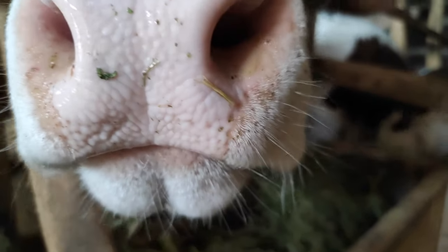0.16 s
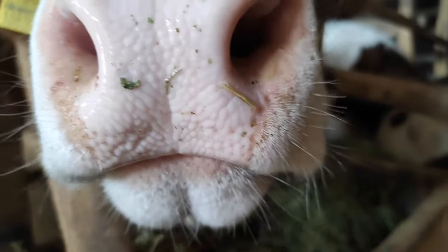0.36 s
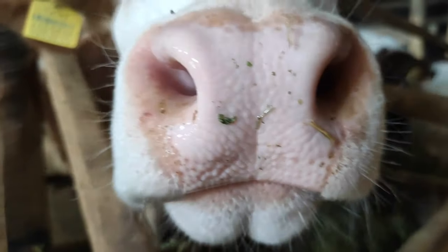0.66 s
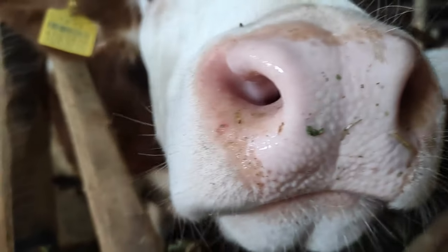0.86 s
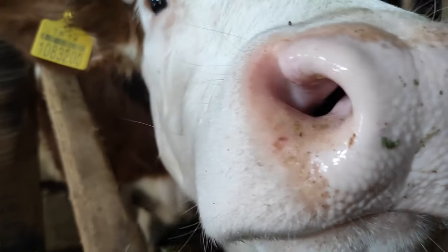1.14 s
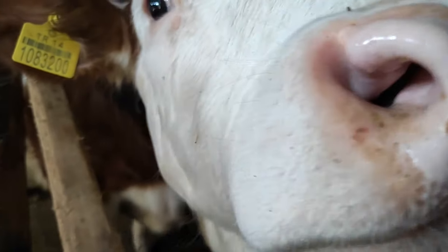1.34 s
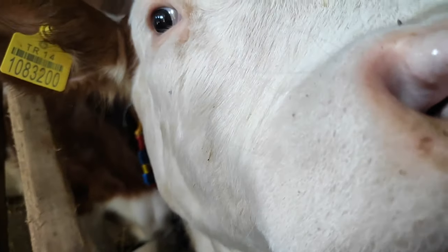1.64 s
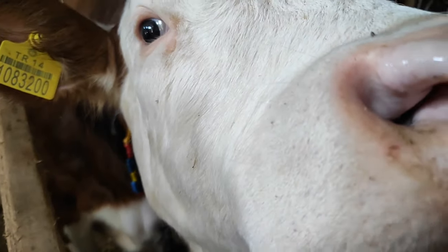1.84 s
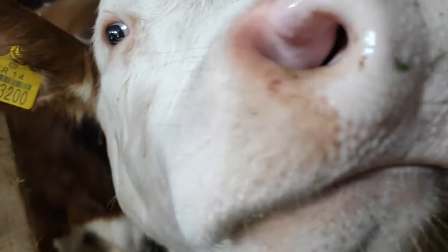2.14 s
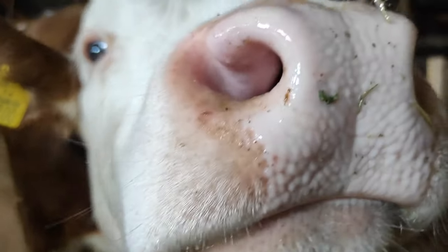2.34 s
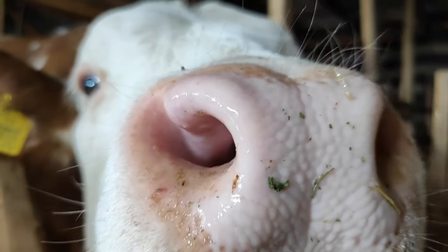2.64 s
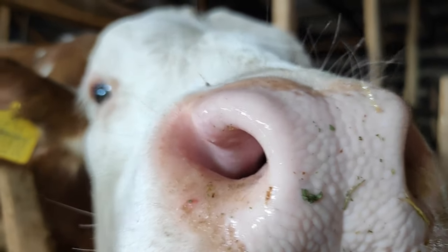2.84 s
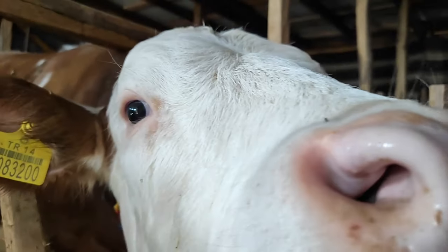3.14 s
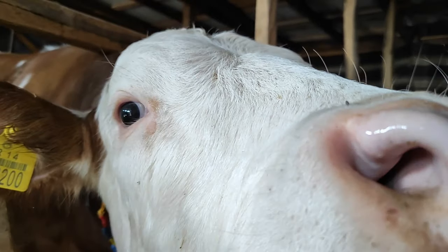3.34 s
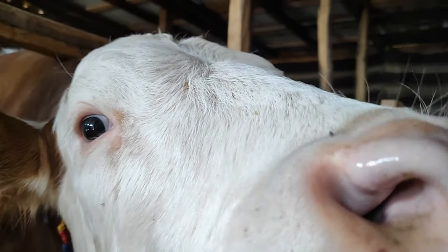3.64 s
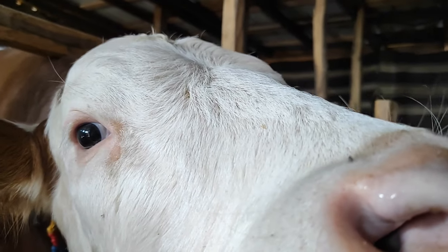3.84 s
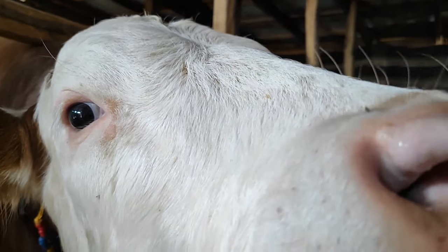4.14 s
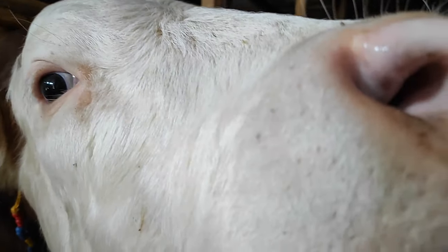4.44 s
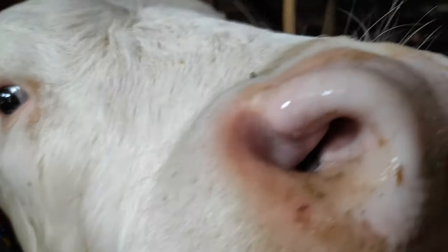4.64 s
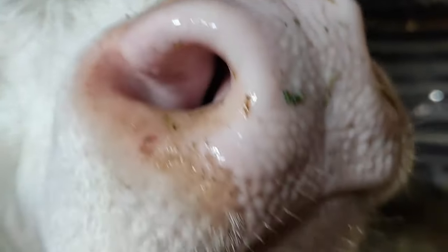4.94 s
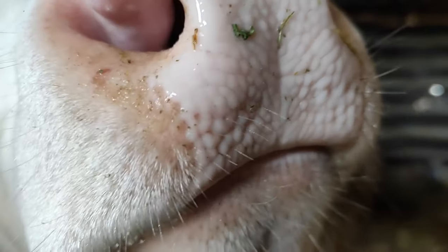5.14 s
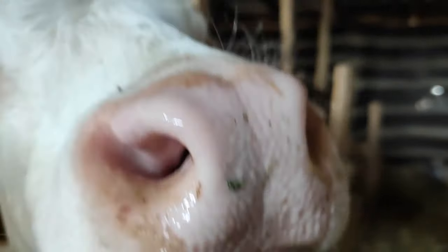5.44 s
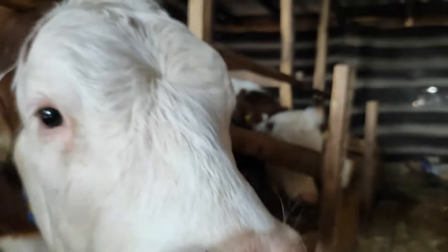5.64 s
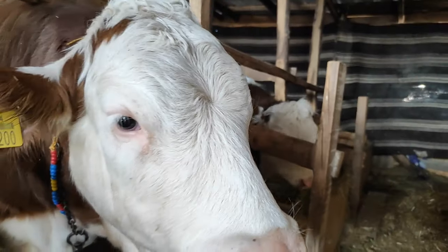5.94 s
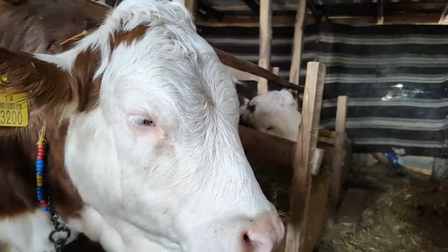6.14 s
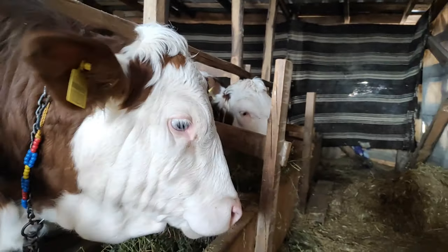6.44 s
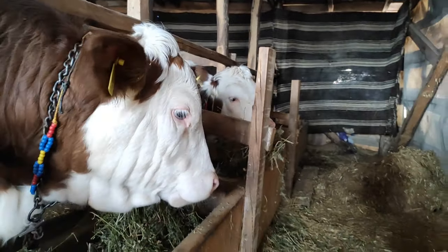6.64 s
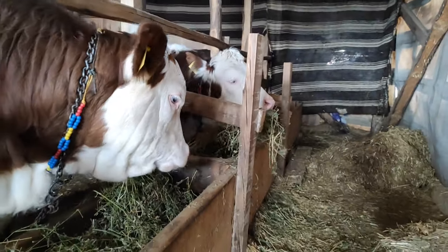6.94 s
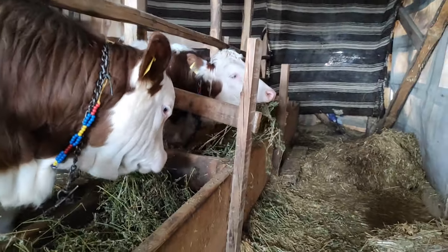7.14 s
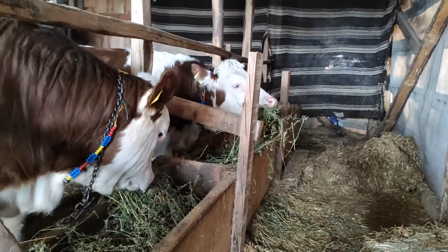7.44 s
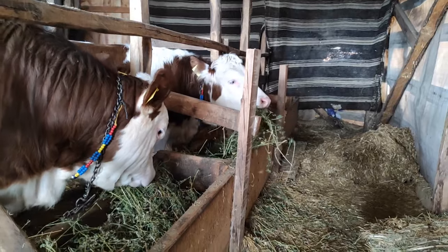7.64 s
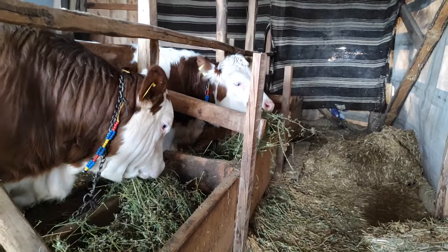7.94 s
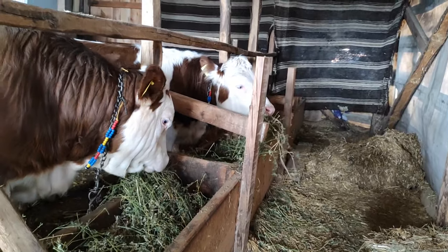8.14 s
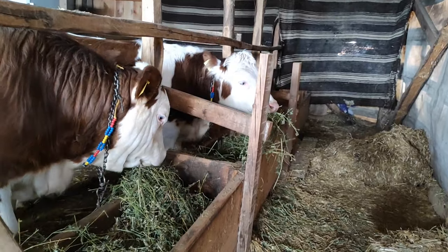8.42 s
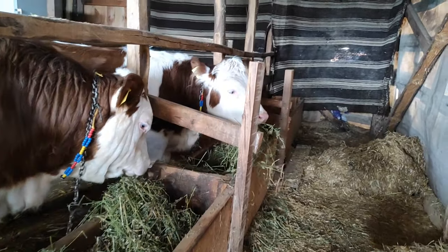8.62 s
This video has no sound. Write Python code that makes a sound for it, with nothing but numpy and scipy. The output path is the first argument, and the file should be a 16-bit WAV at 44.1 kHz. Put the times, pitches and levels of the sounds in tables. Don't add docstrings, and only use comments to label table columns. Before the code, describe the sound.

Close wet nostril blows, hollow plank bumps, fizzing hay and jingling chains as cows feed in a barn, tether jolting near the end.

```python
import sys
import numpy as np
from scipy import signal
from scipy.fft import rfft, irfft
from scipy.io import wavfile
from scipy.ndimage import uniform_filter1d

SR = 44100
rng = np.random.default_rng(int(sys.argv[2]) if len(sys.argv) > 2 else 0)


def wav_out(sig):
    wavfile.write(sys.argv[1], SR, np.round(np.clip(np.atleast_2d(sig).T, -1, 1) * 32767).astype(np.int16))


def amplitude_ratio(level_db):
    exponent = np.asarray(level_db, float) / 20
    return 10 ** exponent


N = 387198


def evened(x):
    return x / np.sqrt(np.mean(x ** 2) + 1e-20)


def read(points, hz):
    f, value = np.transpose(points)
    return np.interp(np.log(hz + 1), np.log(f + 1), value)


def add(mix, s, sound):
    part = mix[round(s * SR):][:len(sound)]
    part += sound[:len(part)]


def coloured(x, points):
    gain_db = np.maximum(read(points, abs(np.fft.fftfreq(4096, 1 / SR))), -90)
    log_gain = np.log(amplitude_ratio(gain_db))
    taps = np.fft.ifft(np.exp(signal.hilbert(log_gain).conj())).real[:2048]
    return signal.oaconvolve(x, taps[None], axes=1)[:, :N]


def level(moves, rest_db, companion=False):
    t = np.arange(0, N + 256, 256) / SR
    peak, rise, fall, db, over_db = np.transpose(moves)[:, :, None]
    away = np.maximum((peak - t) / abs(rise), (t - peak) / abs(fall))
    swell_db = db + companion * over_db - 10 * away
    power = amplitude_ratio(2 * swell_db).sum(0) + amplitude_ratio(2 * rest_db)
    return np.interp(np.arange(N) / SR, t, np.sqrt(power))


# frequency in Hz, left-right likeness from 0 to 1.
PORT_LIKENESS = [(40, 0.36), (150, 0.97), (350, 0.99), (700, 0.18), (2000, 0.18), (8000, 0.11),
                 (14000, 0.41)]


def paired(left, other, hz):
    same = np.clip(read(PORT_LIKENESS, hz), 0, 1)[:, None]
    return np.array([left, same * left + np.sqrt(1 - same ** 2) * other])


def hiss(points, patchy_db, flicker_db, size):
    frames, hz = 4 * N // size + 5, np.fft.rfftfreq(size, 1 / SR)
    a, b, c, d, patches = rng.standard_normal((frames, len(hz), 5)).T
    patches = uniform_filter1d(patches, size=4, axis=0)
    patches = evened(uniform_filter1d(patches, size=12, axis=1))
    flicker = evened(uniform_filter1d(rng.standard_normal(frames), size=6))
    z = paired(a + 1j * b, c + 1j * d, hz)
    z *= amplitude_ratio(read(points, hz)[:, None] + patchy_db * patches + flicker_db * flicker)
    return evened(signal.istft(z, nperseg=size, noverlap=3 * size // 4)[1][:, :N])


def crackle(points, per_s, spread_db):
    size_db = spread_db * np.minimum(rng.exponential(1, (3, N)), 4)
    size = amplitude_ratio(size_db) * rng.choice([-1, 1], (3, N))
    clicks = size * (rng.random((3, N)) < per_s / SR)
    return evened(coloured(clicks[:2] + 0.62 * clicks[2], points))


# frequency in Hz, density in dB per Hz.
HUM_COLOUR = [(12, -54), (20, -9.5), (81, -21.5), (150, -1), (200, -0.5), (260, -31), (440, -120)]


def still_air():
    return amplitude_ratio(-54.5 + 3.5) * hiss(HUM_COLOUR, patchy_db=3.0, flicker_db=3.0, size=2048)


# peak in seconds,
# rise in seconds per 10 dB, fall in seconds per 10 dB, air in dB, plank rumble over air in dB.
SNORTS = [(0.0, .3, 0.1, -48, 6), (.37, 1.5, -2, -57.5, 8), (.8, 0.4, 0.4, -47, 4.5),
          (1.0, 0.07, 0.36, -44.5, 1.5), (1.17, -0.07, 0.3, -41, 6), (1.31, -0.15, 0.1057, -37.5, 9),
          (1.4, -0.3, 0.0799, -42, 9.5), (1.52, -0.05, 0.18, -45.5, 7), (1.88, 0.16, -0.02, -40, 6.5),
          (2.27, 0.15, 0.1955, -45, -4), (2.45, 0.1172, 0.4, -53.5, 9.5), (2.7, 0.2169, 0.0378, -47.5, 9.5),
          (3.2, 0.3, 0.1461, -48.5, 1), (3.83, 0.04, 0.11, -37.5, -1.5), (3.89, 0.0862, 0.0206, -49.5, 9),
          (4.67, 0.6, 1.84, -51.5, 8.5), (5.04, 0.0304, 0.3, -36.5, -6), (5.41, 0.0831, 0.22, -26.5, -11.5),
          (5.68, 0.22, 0.07, -33.5, -5.5), (5.78, 0.24, 0.01, -39.5, -2.5), (6.19, 0.4, -0.3, -46, -7),
          (6.42, 0, 1.4, -56.5, 8.5), (6.82, 0.08, 0.2, -31, -11), (7.0, 0.03, 0.07, -31, -9),
          (7.6, 0.1, 0.8686, -48, -5), (7.87, 0.08, 0.22, -34.5, -16), (8.33, 0.65, 0.0646, -52, 9)]
# frequency in Hz, density in dB per Hz.
RUMBLE_COLOUR = [(53, -50), (90, -13.5), (147, -10.5), (227, 3.5), (314, -11.5), (360, -9.5), (400, 0),
                 (520, -42.5), (880, -120)]


def rumble():
    noise = hiss(RUMBLE_COLOUR, patchy_db=3.0, flicker_db=0.5, size=1024)
    return amplitude_ratio(1.0) * level(SNORTS, rest_db=-62, companion=True) * noise


# frequency in Hz, density in dB per Hz.
BREATH_COLOUR = [(180, -37), (300, -11), (449, -1), (522, -6.5), (589, -0.5), (790, -7), (997, -7),
                 (1100, -10.5), (1430, -41.5), (2420, -120)]


def blowing():
    air = hiss(BREATH_COLOUR, patchy_db=3.0, flicker_db=1.0, size=512)
    bumps = crackle(BREATH_COLOUR, per_s=130, spread_db=1.5)
    return amplitude_ratio(4.5) * level(SNORTS, rest_db=-61) * evened(air + .6 * bumps)


# peak in seconds, rise in seconds per 10 dB,
# fall in seconds per 10 dB, scraping in dB, stalks over scraping in dB.
PULLS = [(0.0, .3, 0.5, -52, 3.5), (.37, 0.23, 0.22, -59.5, 16), (.8, 0, -1.5, -53.5, 3.5),
         (1.155, 0.012, 0.4, -40, -1.5), (1.235, 0.025, 0.1, -39, -3), (1.35, 0.08, 0.15, -40.5, -5),
         (1.6, 0.6, -0.5, -57, 5), (1.88, 0.6, 0.13, -48, 4), (2.25, 0.14, 0.25, -48, 8),
         (2.66, 0.36, 0.2, -46.5, 1.5), (3.67, 0.3, 0.5, -50.5, 5), (3.89, 0.08, 0.05, -39.5, -5),
         (4.3, 0.5449, 1.4, -55, 5.5), (5.04, 0.23, 0.104, -45, 3.5), (5.16, 0.06, 0.2, -35.5, -4),
         (5.3, 0.1959, 0.2344, -30.5, -1), (5.44, 0.0887, .15, -32, -2), (5.56, 0.09, 0.1841, -30.5, -4),
         (5.63, .04, 0.09, -33.5, -3.5), (5.74, 0.12, 0.029, -35, -3.5), (6.15, 0.33, 0.18, -43, 1),
         (6.52, 0, 0.17, -42.5, 0.5), (6.36, 0.4, 0.34, -52.5, 7), (6.8, 0.1151, 0.08, -30, -7),
         (6.66, -0.02, 0.3, -39, -3.5), (6.9, -0.02, 0.13, -29.5, -3.5), (6.98, 0.1021, 0.07, -25.5, -3),
         (7.6, 0.1, 0.8, -45.5, -6.5), (7.75, -0.1, -0.11, -30.5, -7.5), (7.89, 0.11, 0.16, -34.5, -2.5),
         (8.26, 0.3976, 0.12, -36.5, -2), (8.68, 0.4, 2, -59, 14)]
# frequency in Hz, density in dB per Hz.
SCRAPE_COLOUR = [(650, -34), (1100, -1), (1300, -3.5), (1410, -2.5), (1630, -3.5), (2180, -4.5),
                 (2960, -2.5), (3350, -4.5), (5000, -15.5), (6500, -42.5), (11000, -120)]


def scraping():
    drag = hiss(SCRAPE_COLOUR, patchy_db=2.5, flicker_db=2.0, size=512)
    slips = crackle(SCRAPE_COLOUR, per_s=250, spread_db=3.0)
    return amplitude_ratio(3.5) * level(PULLS, rest_db=-63) * evened(drag + 0.37 * slips)


# frequency in Hz, density in dB per Hz.
HAY_COLOUR = [(2820, -43), (4800, -10), (6080, -6), (6460, -6), (7820, 3.5), (8650, -7), (9910, -18),
              (13300, -20.5), (15000, -27), (15700, -32.5), (16000, -20.5)]


def hay():
    rustle = hiss(HAY_COLOUR, patchy_db=2.5, flicker_db=1.5, size=256)
    snaps = crackle(HAY_COLOUR, per_s=250, spread_db=0.5)
    return amplitude_ratio(3.5) * level(PULLS, rest_db=-52.5, companion=True) * evened(rustle + 0.51 * snaps)


def place(room, k, s, sound, dry_db, wet_db):
    near, spots = room
    add(near, s, amplitude_ratio(dry_db) * sound)
    add(spots[k % 3], s, amplitude_ratio(wet_db) * sound)


def shaken(hz, t, loose):
    wander = uniform_filter1d(rng.standard_normal((2, len(t))), size=300)
    a, b = (evened(v) for v in uniform_filter1d(wander, size=300))
    tone = (1 + loose * (a + 1j * b)) * np.exp(2j * np.pi * hz * t)
    return tone.imag / np.sqrt(1 + 2 * loose ** 2)


def rings(hz, partials, t60, t):
    return sum(amplitude_ratio(db - 60 * t * ratio / t60) * shaken(hz * ratio, t, loose=.9) for ratio, db in partials)


# ratio to the ring, level in dB.
BOARD_PARTIALS = [(1.0, 6), (1.45, 3), (1.7, 2), (2.1, -3.5), (3.1, -9), (.71, -0.5), (0.52, -6)]


def knock(hz, bright_db):
    t, t60 = np.arange(SR // 5) / SR, .105
    crack = signal.lfilter([.3, -.3], np.poly([.75, .96]), rng.standard_normal(len(t)))
    rattle = crack * amplitude_ratio(bright_db - 60 * t / t60)
    return (amplitude_ratio(-5.5) * rings(hz, BOARD_PARTIALS, .4 * t60, t) + rattle) * np.minimum(t / .003, 1)


# start in seconds, blow in dB, ring in Hz, brightness in dB.
KNOCKS = [(0.19, -37, 216, -23.5), (0.249, -33.5, 677, -5.5), (0.372, -28.5, 203, -1.5),
          (0.614, -32, 191, -14), (0.689, -42.5, 219.5, -4), (1.18, -18, 214, -10),
          (1.453, -19.5, 211.5, -11.5), (1.536, -23, 207, -21.5), (2.212, -29, 236.1, -6.5),
          (3.117, -33, 600, 0), (3.783, -17, 395, 2.5), (3.838, -23, 659, -1), (4.252, -34.5, 207, -13.5),
          (4.542, -37.5, 160.4, -12.5), (4.617, -34, 176, -15), (5.242, -22, 575.8, -5),
          (6.025, -21, 804, 3.5), (6.356, -36, 186, -3), (6.505, -29, 406, 2.5), (6.647, -18, 427, 2),
          (7.405, -29, 302, -2), (7.524, -32.5, 456, 0), (7.685, -23.5, 700, -0.5),
          (8.651, -43, 336.1, -16), (8.736, -34.5, 199, -15)]


def plank_knocks(room):
    for k, (s, db, hz, bright_db) in enumerate(KNOCKS):
        place(room, k, s, amplitude_ratio(db) * knock(hz, bright_db), dry_db=3.5, wet_db=6.5)


# start in seconds, level in dB.
TICKS = [(0.2432, -14), (1.148, -21), (2.4886, -22), (2.594, -16.5), (3.305, -23.5), (3.4316, -22),
         (3.455, -29), (3.475, -27), (3.494, -17), (3.6455, -12.5), (3.7593, -14), (3.7856, -14),
         (4.244, -22), (4.8893, -20), (5.409, -3), (5.9304, -14), (6.02, -8), (6.5, -13.5), (6.6458, -12),
         (7.333, -24), (7.519, -25), (7.5871, -17.5)]


def ticks(room):
    t = np.arange(800) / SR
    for s, db in TICKS:
        add(room[0], s, amplitude_ratio(db - 1.0 - 60 * t / 0.01) * np.diff(rng.standard_normal(801)))


# ratio to the ring, level in dB.
LINK_PARTIALS = [(0.998, 5), (1.119, -1.5)]
# frequency in Hz, level in dB.
CHAIN_MODES = [(1690, -4), (2450, 1), (2950, -3.5), (3900, -1), (6600, 0.5), (8380, -1.5)]


def clink(hz, ring_db):
    t = np.arange(SR // 5) / SR
    crack = rng.standard_normal(len(t)) * (amplitude_ratio(-60 * t / 0.0084) + amplitude_ratio(-3.0 - 60 * t / .06))
    chain = np.zeros(len(t))
    for f, db in CHAIN_MODES:
        mode = np.sin(2 * np.pi * f * rng.uniform(0.97, 1.02) * t)
        chain += amplitude_ratio(db + 2.6 * rng.standard_normal()) * mode
    ring = amplitude_ratio(ring_db) * rings(hz, LINK_PARTIALS, 0.11, t) + amplitude_ratio(-15.5 - 60 * t / .06) * chain
    return (amplitude_ratio(2.5) * crack + ring) * np.minimum(t / .0008, 1)


# start in seconds, crack in dB, ring of the clearer link in Hz,
# ring over crack in dB.
CLINKS = [(0.2436, -24.5, 4201, -14), (0.8345, -35.5, 2250, -19), (0.9497, -30, 8360, -3),
          (1.2208, -22.5, 2478, -20.5), (1.3902, -31, 8270, -0.5), (1.7498, -29, 3970, -12),
          (2.418, -39.5, 4040, -7.5), (2.4877, -34, 2330, -12), (2.593, -28, 2950, -15),
          (2.6713, -33.5, 3921, -7), (2.748, -37, 4012, -5.5), (3.1164, -31, 2435, -11),
          (3.2027, -28, 7600, -17), (3.3045, -33.5, 1680, -29), (3.495, -41, 8837, -5),
          (3.6448, -20.5, 7696, -29.5), (3.7589, -22.5, 1475, -7), (3.7843, -13.5, 6700, -18),
          (3.803, -17, 8150, -17), (4.2423, -24.5, 8470, -10), (4.3629, -31.5, 3720, -8.5),
          (4.6054, -33.5, 3720, -9.5), (4.8883, -28.5, 3690, -6.5), (4.9202, -29.5, 6630, -20.5),
          (5.4087, -15.5, 1497, -17), (5.9294, -34, 3703, -2.5), (6.0216, -14, 7350, -18.5),
          (6.37, -31.5, 3716, -6), (6.5003, -21.5, 6814, -18.5), (6.6436, -32, 7410, -16),
          (7.3335, -28, 6620, -17), (7.521, -29.5, 1682, -10.5), (7.5871, -28.5, 6600, -10)]


def chain_clinks(room):
    for k, (s, db, hz, ring_db) in enumerate(CLINKS):
        place(room, k, s, amplitude_ratio(db) * clink(hz, ring_db), dry_db=2.0, wet_db=1.5)


TWIN_OFFSETS = (-97, -41, 29, 73)


def ping(hz, t60, t):
    t60 = np.clip(t60, .02, 2)
    share = min(.09 / t60, .8)
    twins = sum(np.sin(2 * np.pi * (hz + off) * t + off) for off in TWIN_OFFSETS)
    ring = (np.sin(2 * np.pi * hz * t) + share * twins) / np.sqrt(1 + 4 * share ** 2)
    return amplitude_ratio(-60 * t / t60) * ring * np.minimum(t / .0015, 1)


# start in seconds, ring in Hz, level in dB, t60 in seconds.
PINGS = [(.244, 4067, -28.5, .7), (.244, 4230, -27.5, 0.073), (2.418, 4000, -25, .06),
         (2.418, 5271, -32.5, .12), (2.488, 4010, -26, .05), (2.488, 6529, -31, 0.045),
         (2.593, 2345, -31.5, 0.088), (2.593, 2869, -26, .12), (2.593, 6605, -34, 0.13),
         (2.6, 3720, -38, 0.78), (2.6713, 3940, -28, .06), (2.6713, 2380, -36.5, 0.13),
         (2.747, 4027, -29.5, .07), (3.117, 1679, -37, 0.25), (3.13, 3822, -29, 0.16),
         (3.12, 4400, -30, .14), (3.12, 5400, -34, .1), (3.117, 2939, -32, 0.12), (3.2, 1689, -38.5, .6),
         (3.2, 4181, -31.5, .12), (3.2, 5515, -32, .15), (3.21, 3830, -34, .15), (3.2, 2600, -33, 0.1088),
         (3.785, 2042, -18.5, .08), (3.79, 3140, -12, .07), (3.84, 2500, -19.5, .06),
         (3.94, 3850, -22.5, .05), (4.243, 2250, -35, .12), (4.243, 3700, -31, 0.15),
         (3.648, 344, -19, 0.33), (3.646, 2790, -21, 0.093), (4.243, 6674, -36, .3),
         (4.363, 6580, -35.5, 0.2415), (4.606, 3910, -29, 0.055), (6.03, 1075, -21, 0.27),
         (6.025, 867, -27.5, 0.2167), (6.04, 1318, -27.5, 0.317), (6.165, 1383, -31, 0.1),
         (6.505, 1308, -32, 0.385), (6.505, 1760, -34.5, .3), (6.8, 2132, -21.5, 0.14),
         (6.888, 2170, -18, .11), (8.642, 2930, -30, 0.055), (7.587, 2800, -26, 0.0442),
         (7.722, 6600, -23, 0.087)]


def struck_pings(room):
    t = np.arange(SR // 2) / SR
    for k, (s, hz, db, t60) in enumerate(PINGS):
        place(room, k, s, amplitude_ratio(db) * ping(hz, t60, t), dry_db=-1.5, wet_db=-4.0)


# start in
# seconds, ring in Hz, level in dB, two thirds of the t60 in seconds.
SINGING = [(.34, 4600, -44, 0.17), (.36, 3891, -33, .08), (.244, 4572, -29, 0.11), (.835, 7860, -39, .08),
           (.89, 8240, -28.5, 0.16), (.89, 8900, -33, 0.29), (.947, 8360, -38, 0.32),
           (.947, 11100, -19.5, 0.17), (.947, 7554, -39, 0.4997), (1.375, 8162, -27, 0.18),
           (1.385, 10830, -30, 0.19), (3.117, 2490, -44, 0.16), (3.205, 4900, -38, 0.1),
           (1.91, 7900, -39, 0.14), (4.008, 6976, -34, 0.18), (4.01, 13800, -18.5, 0.21),
           (4.243, 8440, -53.5, 0.23), (4.37, 1650, -45, 0.24), (6.022, 742.6, -31, 0.37),
           (6.022, 3720, -36.5, 0.2332), (6.57, 3750, -30, 0.12), (8.225, 7760, -36, 0.062)]


def singing_rings(room):
    t = np.arange(SR // 2) / SR
    for k, (s, hz, db, t60) in enumerate(SINGING):
        tone = shaken(hz, t, loose=.3) * np.minimum(t / .002, 1)
        place(room, k, s, amplitude_ratio(db - 60 * t / (1.5 * t60)) * tone, dry_db=2.5, wet_db=-1.0)


# start in seconds, length in seconds,
# pitch in Hz, level in dB.
ROUGH_TONES = [(.355, 0.05365, 210.6, -30.5), (.612, .06, 199.8, -37.5), (1.2, .07, 299.6, -28.5),
               (1.22, 0.0874, 11640, -31.5), (1.29, 0.038, 329, -28.5), (1.535, 0.068, 213, -30.5),
               (1.8, 0.09485, 600, -41), (2.24, 0.13, 320, -39), (2.594, .12, 15200, -30.5),
               (5.0, 0.068, 750, -37.5), (5.6, 0.2038, 802, -37.5), (6.035, .08, 1097, -28.5),
               (6.11, 0.084, 1300, -39), (6.39, .1, 15360, -31.5), (7.685, .05, 700, -27),
               (5.11, 0.11, 1980, -35.5), (5.2, 0.21, 602, -28.5), (5.28, 0.11, 2458, -28),
               (5.42, .25, 608, -31), (5.45, .12, 2450, -30.5), (5.3, 0.2553, 994, -34), (6.66, 0.13, 705, -29),
               (6.78, 0.11888, 905, -29.5), (6.89, 0.064, 2193, -24), (7.78, 0.1042, 8330, -33.5),
               (7.81, .08, 7906, -32.5), (7.88, .14, 703, -31.5), (7.95, 0.085, 847, -34.5),
               (8.22, 0.054, 7600, -33)]


def rough_tones(room):
    t = np.arange(SR // 2) / SR
    for k, (s, length, hz, db) in enumerate(ROUGH_TONES):
        u = t[t < max(length, .03)]
        swell = abs(np.sin(np.pi * u / u[-1])) ** .5
        place(room, k, s, amplitude_ratio(db) * swell * shaken(hz, u, loose=.8), dry_db=1.5, wet_db=-1.5)


# start in seconds, blow in dB,
# ring in Hz, brightness in dB.
CLOSE = [(.36, -34, 2356, 7.5), (.45, -35.5, 798, -0.5), (1.146, -30.5, 890, 6), (1.495, -25, 240, -10.5),
         (3.644, -12, 504, -2.5), (3.646, -18, 676.8, -8), (3.672, -20, 342, -12), (3.757, -26, 1482, -3),
         (6.644, -22, 642, -1.5), (7.519, -32.5, 1646, 0), (3.846, -20.5, 699, -0.5),
         (3.866, -24.5, 806.1, 1), (4.982, -33, 1784, 4), (5.415, -18, 616, -4), (5.545, -22, 897, 2.5),
         (6.165, -30, 1340, -2.5), (7.3964, -34, 1328, -1), (7.6353, -30.5, 1506, 2.5),
         (7.6762, -28, 1310, 3), (7.8648, -25.5, 995, 1), (7.9367, -29, 798, -1), (8.2385, -26.5, 1728, -1),
         (8.3078, -27, 2140, -2.5), (8.6426, -36, 2707, -2), (8.7009, -40.5, 2346, -3)]


def close_knocks(room):
    for k, (s, db, hz, bright_db) in enumerate(CLOSE):
        place(room, k, s, amplitude_ratio(db) * knock(hz, bright_db), dry_db=6.0, wet_db=2.0)


# start in seconds, crack in dB.
JOLTS = [(6.729, -21), (6.7872, -16), (6.8514, -15), (6.8923, -13.5), (7.6517, -23), (7.7222, -15.5),
         (7.784, -14.5), (7.9801, -25), (8.0189, -17), (8.09, -23.5), (8.2302, -20.5), (8.3062, -24)]


def tether_jolts(room):
    for k, (s, db) in enumerate(JOLTS):
        place(room, k, s, amplitude_ratio(db) * clink(hz=2240, ring_db=-25), dry_db=-2.5, wet_db=3.5)


# frequency in Hz, t60 in seconds.
BARN_T60 = [(200, 0.48), (700, 0.37), (2500, 0.58), (8000, 0.4), (15000, 0.057)]


def barn(x):
    taps = np.zeros((2, SR // 2))
    at = np.arange(120, SR // 2 - 20, 20) + rng.integers(0, 20, (2, (SR // 2 - 121) // 20))
    np.put_along_axis(taps, at, rng.choice([-1., 1.], at.shape), 1)
    hz, t, (left, other) = signal.stft(taps, SR, nperseg=256)
    z = paired(left, other, hz) * amplitude_ratio(-60 * t / read(BARN_T60, hz)[:, None])
    tail = signal.istft(z, SR, nperseg=256)[1]
    return signal.fftconvolve(x[None], tail / np.linalg.norm(tail[0]), axes=1)[:, :N]


# frequency in Hz, gain in dB.
PORT_COLOUR = [(40, -31), (100, -16.5), (170, -3.5), (1000, 1.5), (4800, -9.5), (7800, 2.5), (9000, -8),
               (9800, -17.5), (15500, -24)]


def blows():
    near, spots = room = np.zeros(N), np.zeros((3, N))
    for source in (plank_knocks, ticks, chain_clinks, struck_pings, singing_rings, rough_tones,
                   close_knocks, tether_jolts):
        source(room)
    return coloured(near + sum(barn(x) for x in spots), PORT_COLOUR)


def scene():
    return still_air() + rumble() + blowing() + scraping() + hay() + blows()


# frequency in Hz, left over right in dB.
PORT_BALANCE = [(60, 4.5), (180, 3), (550, 3.5), (1650, 1.5), (4970, 0.5), (15000, -3)]


def band_limit(x):
    return signal.sosfilt(signal.butter(12, 16130, fs=SR, output="sos"), x)


def record(dry):
    hz = np.fft.rfftfreq(N, 1 / SR)
    half_db = read(PORT_BALANCE, hz) / 2
    late = np.exp(-2j * np.pi * hz * 20 / SR)
    mix = irfft(rfft(dry) * np.array([amplitude_ratio(half_db) * late, amplitude_ratio(-half_db)]), N)
    return band_limit(mix)


dry = scene()
out = record(dry)
wav_out(out)
```